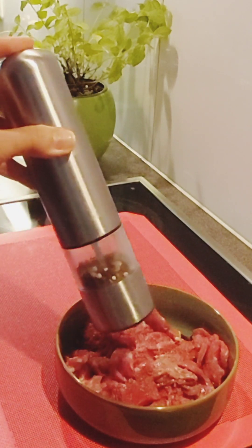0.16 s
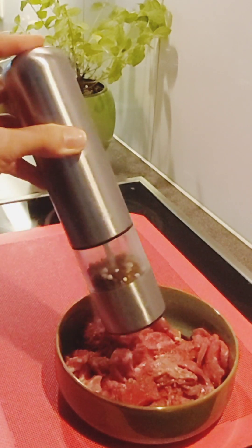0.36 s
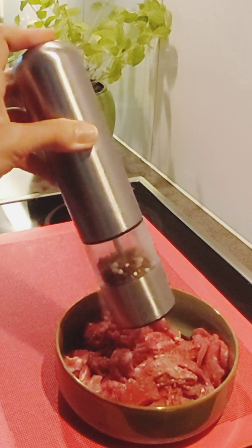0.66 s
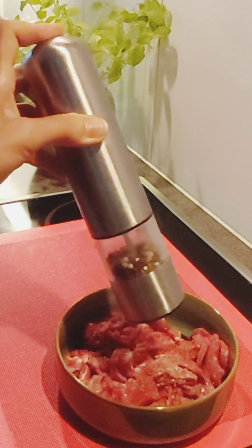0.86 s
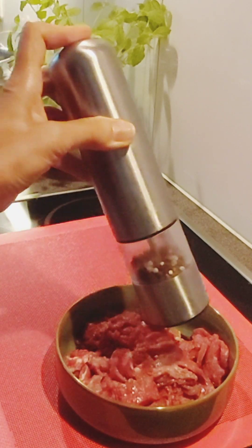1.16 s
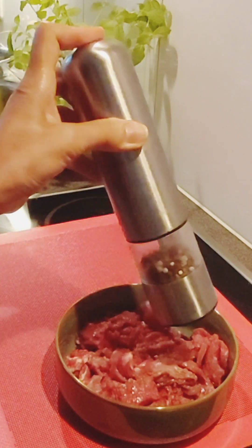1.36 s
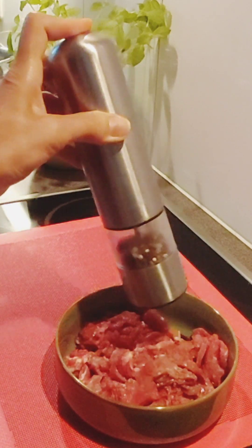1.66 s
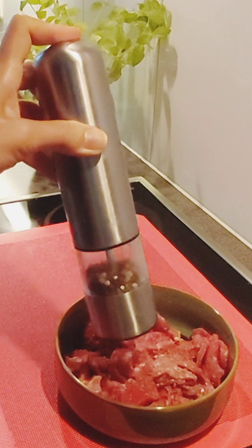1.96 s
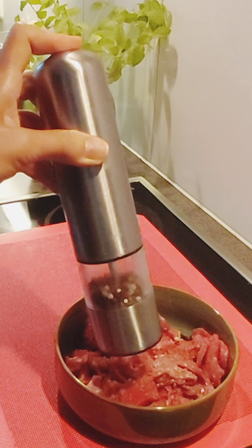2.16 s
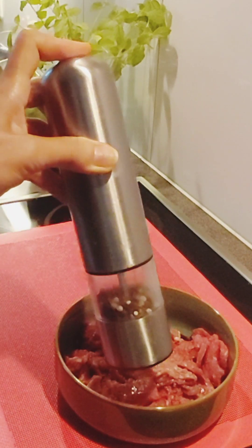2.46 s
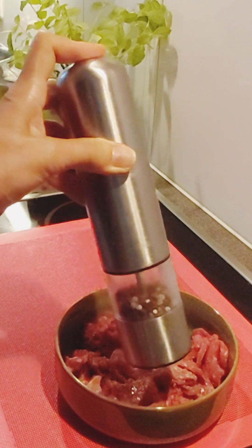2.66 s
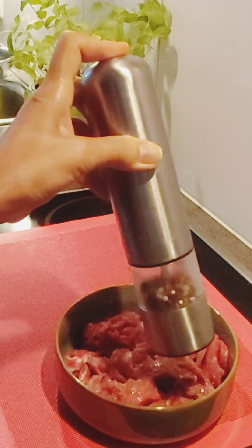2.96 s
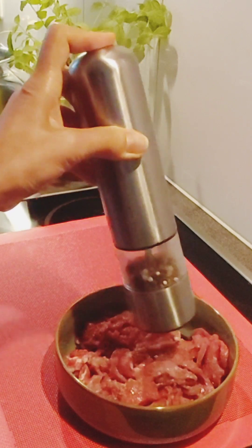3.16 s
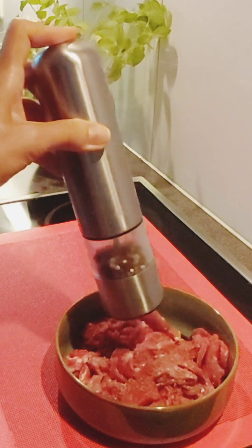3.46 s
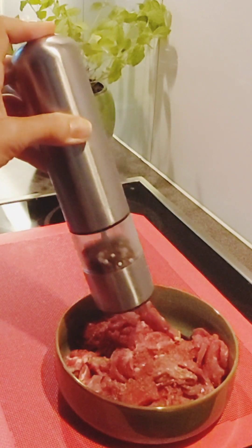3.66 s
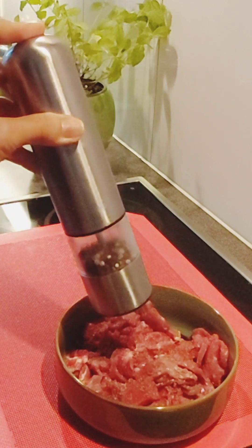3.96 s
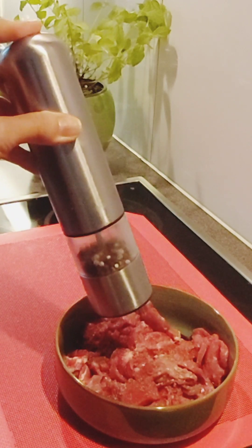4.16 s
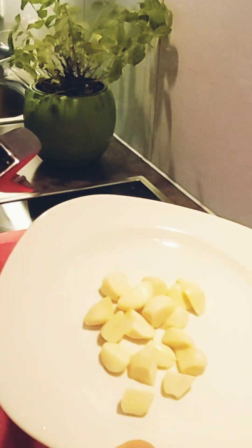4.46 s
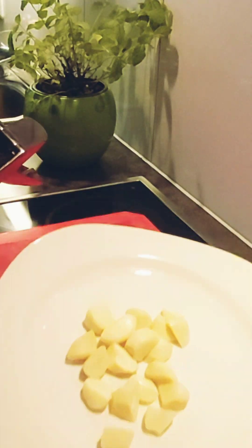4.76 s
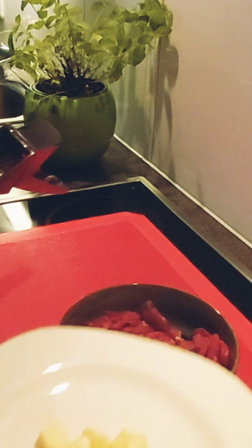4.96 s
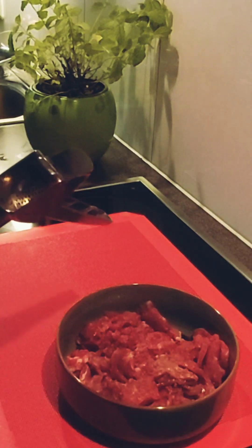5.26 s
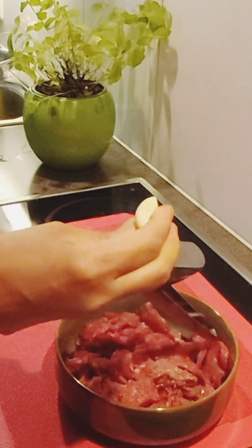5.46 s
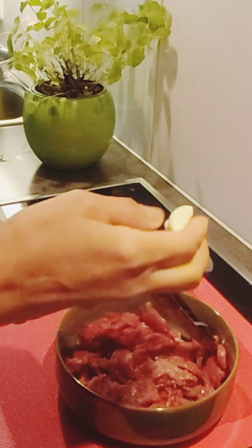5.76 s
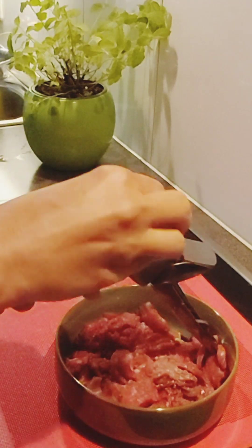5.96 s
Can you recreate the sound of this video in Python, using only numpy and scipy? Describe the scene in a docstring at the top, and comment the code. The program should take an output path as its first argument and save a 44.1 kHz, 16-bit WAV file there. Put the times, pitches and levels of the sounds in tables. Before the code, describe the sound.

Electric grinder buzzing and rattling close by for over four seconds, stopping dead; faint rustle, small clicks and a dull thud follow.

```python
"""Battery pepper mill in a small kitchen

A motor drives an eleven-tooth pinion: sines on multiples of the shaft angle hum and whine. Noise-like tooth
contacts ring the steel housing as a rattle; peppercorns crack in the burr as short, partly noisy rings.
The whir breaks off abruptly; in the quiet room hands move kitchen things about (ticks, rustle, scrape in
filtered noise) and one of them knocks dully (damped modes). Steady room noise and a faint drone lie below."""
import sys
import numpy as np
from scipy import signal
from scipy.fft import rfft, irfft, next_fast_len
from scipy.io import wavfile
from scipy.ndimage import uniform_filter1d

SR = 44100
rng = np.random.default_rng(int(sys.argv[2]) if len(sys.argv) > 2 else 0)


def digitize_waveform(pressure):
    """Quantize a signal to 16-bit integers and store it at the path in sys.argv[1].

    Rows of a 2-D input are taken as channels; values are limited to [-1, 1].
    """
    field = np.atleast_2d(pressure).T
    bounded = np.clip(field, -1, 1)
    quanta = np.round(bounded * 32767).astype(np.int16)
    wavfile.write(sys.argv[1], SR, quanta)


N = 269041
WHIR_END_S = 4.322

# slow level changes of the whir: (time [s], 3.2 kHz resonance [dB], 4.3 kHz resonance [dB],
# 5.7 kHz resonance [dB], treble [dB], shaft tone [dB])
WHIR_COLOUR = [(0, 5.5, -0.5, 1, -4.5, -71.5), (.5, 1, -1, 8.5, -2.5, -75.5), (1, -1, -3, 8.5, -1.5, -85),
               (1.15, 3, 3, 7.5, -1, -84), (1.4, 4, 0, -2.5, -0.5, -82), (1.7, 1, 1.5, -3.5, -2.5, -83.5),
               (2.2, 2.5, 3, 4.5, -2.5, -74), (2.6, -4, 5.5, -2, -1, -77), (2.9, -2, -3, 7, 1, -68.5),
               (3.15, -2, -6.5, -5, -2.5, -70.5), (3.45, 4.5, 3.5, -2, 0.5, -68),
               (3.6, 3.5, 1.5, 4, -1.5, -69.5), (3.8, 8, 3.5, 5.5, -1, -76.5), (4, 5.5, -3, 2.5, -1, -71.5),
               (4.32, 4, 1, 7.5, 1, -66.5)]
# noise spectrum of room and rustle: (frequency [Hz], relative density [dB per Hz])
ROOM_SPECTRUM = [(18, -39.5), (30, -13.5), (50, -6), (160, -5.5), (518, -14), (575, -13.5), (767, -12),
                 (1290, -20.5), (2130, -22.5), (3230, -27), (4310, -24), (7080, -32.5), (10200, -30),
                 (12600, -20.5), (15500, -22)]


def from_db(db):
    """Decibels to gain."""
    return 10 ** (np.asarray(db) / 20)


def rms_one(x):
    """Scale to unit rms."""
    return x / np.sqrt(np.mean(x ** 2) + 1e-20)


def in_time(rows):
    """Columns of a curve table at every sample."""
    time_s, *columns = np.transpose(rows)
    return [np.interp(np.arange(N) / SR, time_s, column) for column in columns]


def at_hz(points, hz):
    """Read a spectrum on a log-frequency axis."""
    point_hz, value = np.transpose(points)
    return np.interp(np.log(hz + 1e-9), np.log(point_hz), value)


def drift(corner_hz):
    """Slow random curve, unit rms: noise at SR / 40 through a double pole."""
    r = np.exp(-2 * np.pi * corner_hz * 40 / SR)
    settle = 2000
    noise = rng.standard_normal(N // 40 + 2 + settle)
    slow = signal.lfilter([1], [1, -2 * r, r * r], noise)[settle:]
    return np.interp(np.arange(N) / 40, np.arange(len(slow)), rms_one(slow))


def resonance(x, hz, width_hz):
    """Two-pole resonance with gain 1 on top."""
    r = np.exp(-np.pi * width_hz / SR)
    zeros = [(1 - r * r) / 2, 0, (r * r - 1) / 2]
    poles = [1, -2 * r * np.cos(2 * np.pi * hz / SR), r * r]
    return signal.lfilter(zeros, poles, x)


def band(x, low_hz, high_hz):
    """Band-pass."""
    return signal.sosfilt(signal.butter(2, [low_hz, high_hz], "band", fs=SR, output="sos"), x)


def coloured(x, spectrum):
    """Impose a spectrum; rms 1."""
    size = next_fast_len(N)
    gain = from_db(at_hz(spectrum, np.fft.rfftfreq(size, 1 / SR)))
    return rms_one(irfft(rfft(x, size) * gain, size)[..., :N])


def bursts(events, cycles, noisy, gain_db, rise_s=0.00032):
    """Short rings, each at its own pitch and partly noise, falling 60 dB within some cycles."""
    length = 4000
    out = np.zeros(N)
    t = np.arange(length) / SR
    noise = rng.standard_normal((len(events), length))
    for (start_s, level_db, hz, *_), hiss in zip(events, noise):
        hiss = rms_one(band(hiss, hz / 1.5, min(hz * 1.5, .45 * SR)))
        envelope = (1 - np.exp(-t / rise_s)) * np.exp(-np.log(1000) * t * hz / cycles)
        ring = (np.sin(2 * np.pi * hz * t) + noisy * hiss) * envelope
        at = round(start_s * SR)
        out[at:at + length] += from_db(level_db + gain_db) * ring[:N - at]
    return out


def tones(turns, orders, wobble_db):
    """Sines on multiples of the shaft angle, each wavering in level."""
    out = 0
    for order, level_db in orders:
        waver_db = wobble_db * (.3 * drift(5) + .9 * drift(30))
        sine = np.sqrt(2) * np.sin(2 * np.pi * round(order) * turns)
        out = out + from_db(level_db + waver_db) * sine
    return out


def motor():
    """Shaft angle in turns, and the tones locked to it: unbalance, slot hum, tooth whine."""
    # (time [s], shaft speed [turns/s], slot hum [dB], tooth whine before braking and slack [dB])
    motor_curve = [(0.0, 172.8, -65, -43), (0.16, 189.9, -64, -51), (0.25, 197.5, -61, -46),
                   (0.46, 215.4, -58, -43), (0.54, 215.8, -55, -40), (0.6, 211.5, -56, -41),
                   (0.655, 196.5, -58, -46), (0.75, 195.5, -64, -47), (0.86, 194.5, -66, -41),
                   (0.95, 203.4, -65, -43), (1.07, 206.0, -63, -40), (1.14, 199.0, -57, -43),
                   (1.24, 202, -55, -41), (1.34, 205.5, -60, -38), (1.44, 208.5, -57, -42),
                   (1.55, 213.8, -57, -36), (1.63, 208.5, -60, -41), (1.87, 189.4, -65, -46),
                   (1.95, 193.1, -63, -47), (2.08, 194.5, -63, -46), (2.16, 196, -64, -47),
                   (2.22, 191.5, -65, -51), (2.33, 187, -63, -50), (2.44, 195.5, -63, -48),
                   (2.54, 197.5, -59, -43), (2.68, 201, -60, -44), (2.75, 209, -59, -52),
                   (2.82, 217, -59, -48), (2.93, 220.5, -63, -42), (3.03, 223.3, -61, -38),
                   (3.12, 221.5, -61, -41), (3.23, 219.5, -64, -49), (3.34, 220, -62, -39),
                   (3.44, 220.8, -60, -48), (3.54, 219.5, -58, -40), (3.68, 217, -55, -40),
                   (3.82, 214.8, -54, -38), (3.93, 216.5, -56, -41), (4.03, 218.6, -58, -44),
                   (4.15, 220, -57, -47), (4.32, 221.5, -62, -51)]
    # fainter tones: (time [s], 4th and 5th shaft order [dB], 2nd slot harmonic [dB],
    # 2nd tooth harmonic, base level [dB])
    octaves = [(0, -70, -57, -52), (.16, -68, -57, -49), (.5, -63, -62, -58), (.65, -70, -57, -52),
               (.82, -70, -57, -47), (.95, -70, -57, -53), (1.08, -71, -58, -44), (1.18, -72, -58, -46),
               (1.3, -67, -57, -52), (1.5, -60, -55, -49), (1.6, -66, -54, -43), (1.68, -67, -55, -49),
               (1.87, -69, -60, -47), (2.14, -70, -57, -42), (2.25, -70, -57, -50), (2.44, -67, -55, -51),
               (2.54, -66, -54, -43), (2.68, -65, -52, -51), (2.82, -64, -64, -56), (3.2, -65, -63, -62),
               (3.82, -63, -57, -60), (4.32, -62, -63, -62)]
    # (multiple of the shaft [1], relative level [dB])
    hum_orders = [(3, -2), (9, -9)]
    # (multiple of the shaft [1], relative level [dB])
    whine_orders = [(11, -1.5), (12, -13), (33, -22)]
    brake_whine_db, hard_brake_turns_per_s2 = 13, 220
    whine_slack_db_per_db = 3   # whine loss per dB of rattle slack
    chatter_db, chatter_hz = -5.5, 69

    turns_per_s, hum_db, whine_db = in_time(motor_curve)
    shaft_db, slot_octave_db, tooth_octave_db = in_time(octaves)
    turns_per_s = uniform_filter1d(turns_per_s, size=1500)   # rotor inertia rounds the corners
    braking = np.clip(-np.gradient(turns_per_s) * SR / hard_brake_turns_per_s2, 0, 1)
    whine_db = whine_db + brake_whine_db * braking   # teeth sing louder while the shaft slows
    whine_db -= whine_slack_db_per_db * slack_db()
    turns = np.cumsum(turns_per_s) / SR
    turns += .008 * drift(25)   # shaft judder blurs high orders most

    hum = from_db(hum_db) * tones(turns, hum_orders, wobble_db=2.4)
    hum += from_db(slot_octave_db) * tones(turns, [(6, 0)], wobble_db=2.0)
    hum += from_db(shaft_db) * tones(turns, [(4, 0), (5, 0)], wobble_db=1.5)
    unbalance = from_db(in_time(WHIR_COLOUR)[-1]) * tones(turns, [(1, 0)], wobble_db=1.5)
    whine = from_db(whine_db) * tones(turns, whine_orders, wobble_db=2.2)
    whine += from_db(tooth_octave_db) * tones(turns, [(22, 1)], wobble_db=3.5)
    # loaded teeth chatter: a rough skirt round both tooth tones
    chatter = sum(drift(chatter_hz) * tones(turns, [(k, 0)], wobble_db=2.0) for k in (11, 22))
    whine += from_db(tooth_octave_db + chatter_db) * chatter
    return turns, hum + unbalance + whine


def rattle(turns):
    """Dense uneven tooth contacts, stronger once a turn, excite housing modes that swell independently."""
    # gears and burr, before flutter and lulls: (time [s], 2.6-6 kHz level [dB])
    rattle_curve = [(0.0, -29.5), (0.01, -36), (0.29, -37), (0.31, -42.5), (0.34, -33.5), (0.4, -39.5),
                    (0.62, -34), (0.74, -37.5), (0.76, -35), (0.78, -36), (0.88, -36.5), (0.92, -39.5),
                    (0.97, -34.5), (1.01, -37), (1.09, -36), (1.32, -38), (1.34, -38), (1.42, -35),
                    (1.44, -41.5), (1.62, -33), (1.64, -37), (1.74, -34), (1.76, -36.5), (2.24, -36.5),
                    (2.34, -33.5), (2.42, -39.5), (2.44, -30), (2.46, -36), (2.58, -34.5), (2.7, -38),
                    (3.1, -37), (3.11, -36), (3.18, -35), (3.2, -38), (3.3, -36), (3.43, -38.5),
                    (3.82, -38), (4.27, -39), (4.28, -35), (4.31, -41.5)]
    # between the resonances: (frequency [Hz], relative density [dB per Hz])
    rattle_spectrum = [(180, -62), (500, -40.5), (800, -24.5), (1500, -14), (3000, -7.5), (5000, -11),
                       (7000, -17), (9500, -28), (13000, -31), (15500, -49.5)]
    # resonances: (frequency [Hz], width [Hz], mean level [dB])
    housing = [(1205, 91, -17.5), (1466, 26, -12), (1695, 40, -9), (1839, 62, -7), (2010, 67, -9.5),
               (2337, 100, -1.5), (2633, 49, -4.5), (2803, 44, -9), (2910, 40, -10), (3130, 45, -3),
               (3520, 90, -7.5), (4150, 45, -7.5), (4211, 35, -8), (4536, 78, -8), (4630, 90, -8),
               (7760, 760, -10.5), (10730, 910, -15.5), (12100, 800, -45)]
    # resonances with slowly changing level: (frequency [Hz], width [Hz], base level [dB])
    changing = [(3220, 79, -2.5), (4334, 147, -1.5), (5677, 160, -10.5)]
    # where the housing radiates badly: (frequency [Hz], width [Hz], share removed [0-1])
    valleys = [(3984, 190, 0.3), (5080, 280, 0.2), (6850, 500, 0.2)]

    level_db, = in_time(rattle_curve)
    level_db = level_db + 0.56 * drift(25) - slack_db()
    *changing_db, treble_db, _ = in_time(WHIR_COLOUR)
    contact_db = 1.6 * drift(110) + 1.4 * np.sin(2 * np.pi * turns)
    contacts = rng.standard_normal((3, N)) * from_db(contact_db)
    out = from_db(-15.5) * coloured(contacts[2], rattle_spectrum)
    for k, (hz, width_hz, top_db) in enumerate(housing):
        swell_db = 1.5 * drift(0.69) + 0.98 * drift(3.1)
        out += from_db(top_db + swell_db) * resonance(contacts[k % 2], hz, width_hz)
    for (hz, width_hz, top_db), gain_db in zip(changing, changing_db):
        swell_db = gain_db + 1.8 * drift(8.84)
        out += from_db(top_db + swell_db) * resonance(contacts[0], hz, width_hz)
    for hz, width_hz, share in valleys:
        out -= np.clip(share, 0, 1) * resonance(out, hz, width_hz)
    out += (from_db(treble_db + 1.1 * drift(24)) - 1) * band(out, 7500, 22000)
    return from_db(level_db) * out / np.std(band(out, 2600, 6000))


def slack_db():
    """Bell-shaped lulls in which the teeth lose contact, as dB of loss."""
    # (centre time [s], depth [dB], full width at 1/e of the depth [s])
    lulls = [(0.305, 17, 0.0095), (0.415, 1.5, 0.097), (0.753, 6, 0.015), (0.914, 2, 0.053),
             (1.03, 0.5, 0.049), (1.347, 3.5, 0.033), (1.446, 2.5, 0.024), (2.46, 3, 0.048),
             (2.82, 8.5, 0.018), (3.22, 1.5, 0.068), (4.331, 10, 0.025)]
    t = np.arange(N) / SR
    return sum(depth_db * np.exp(-(2 * (t - s) / width_s) ** 2) for s, depth_db, width_s in lulls)


def knocking():
    """Peppercorns give way: a mid knock over a low thump, with a shell crack on top."""
    # (time [s], level before burst gain [dB], pitch [Hz], thump rel. [dB], crack rel. [dB])
    knock_events = [(0.187, -23.5, 1060, -23, -15), (.498, -42, 754, -17, -10), (.655, -41, 640, -10, -12),
                    (.845, -41.5, 894, -5, -12), (1.11, -37, 890, -6, -10), (1.459, -43.5, 696, -1, -13),
                    (1.61, -24, 1070, -30, -9), (1.687, -25, 1100, -17, -16),
                    (2.3246, -31.5, 780, -2.5, 3.5), (2.504, -25, 990, -25.5, -21.5),
                    (2.63, -33.5, 830, -14, -14), (2.677, -43.5, 810, -15, -9.5),
                    (3.795, -39, 1110, -21, 7)]
    thump_hz, crack_hz = 332, 2040
    thump_events = [(s, db + thump_db, thump_hz) for s, db, _, thump_db, _ in knock_events]
    crack_events = [(s, db + crack_db, crack_hz) for s, db, _, _, crack_db in knock_events]
    knocks = bursts(knock_events, cycles=6.3, noisy=0.6, gain_db=11.0, rise_s=0.0015)
    thumps = bursts(thump_events, cycles=15.0, noisy=0.61, gain_db=-3.0, rise_s=0.0039)
    cracks = bursts(crack_events, cycles=35.0, noisy=1.9, gain_db=0.5)
    return band(knocks, 510, 3400) + band(thumps, 220, 900) + cracks


def crackle():
    """Peppercorns snap: bright, dry, mostly noisy bursts."""
    # (time [s], level before burst gain [dB], pitch [Hz])
    snaps = [(0.2438, -38, 8000), (0.3366, -38, 8000), (0.4983, -31, 7700), (0.5681, -33, 7900),
             (0.605, -30, 8400), (0.7756, -34, 8000), (0.9702, -35, 8200), (1.065, -33, 8000),
             (1.4826, -16, 13500), (1.4839, -20, 11500), (1.485, -20, 14000), (1.4861, -17, 12500),
             (1.4875, -23, 11500), (1.4893, -20, 12500), (1.493, -24, 13500), (1.4975, -26, 14000),
             (2.4114, -34, 8000), (2.832, -38, 7550), (4.0736, -37, 8000)]
    return bursts(snaps, cycles=55.0, noisy=2.5, gain_db=-9.5, rise_s=.0001)


def thud():
    """One soft blow on a few damped modes."""
    # (frequency [Hz], relative level [dB], t60 [s])
    thud_modes = [(180, -4, 0.027), (288, 6, 0.032), (316, -14.5, 0.44), (614, 6.5, 0.013), (895, -3, 0.02),
                  (1500, -28, 0.036), (1850, -19, 0.054)]
    start_s, level_db, rise_s = 5.9065, -39, .0005
    t = np.maximum(np.arange(N) / SR - start_s, 0)
    modes = sum(from_db(level_db + mode_db - 60 * t / t60_s) * np.sin(2 * np.pi * hz * t)
                for hz, mode_db, t60_s in thud_modes)
    modes *= 1 - np.exp(-t / rise_s)
    return -band(modes, 150, 2200)


def handling():
    """Handled things: ringing ticks, a soft resonant scrape, and noise rustle in a low and a high range."""
    # ticks and taps: (time [s], level before burst gain [dB], pitch [Hz], left-right [dB])
    tick_events = [(4.5797, -56, 12600, -5), (4.65, -61, 3650, -2.5), (4.801, -53, 5280, -4),
                   (4.9462, -54, 13000, -1), (4.978, -59, 4828, 6), (5.231, -62, 4632, 0),
                   (5.241, -65, 4500, 0), (5.2719, -66, 800, -4), (5.297, -66, 1650, -9),
                   (5.297, -61, 3500, -9), (5.3047, -53.5, 1800, -3), (5.3043, -60, 800, -11),
                   (5.3136, -62, 1800, -4), (5.3607, -64, 4700, -0.5), (5.5807, -68, 2630, -6),
                   (5.608, -61, 7700, -10), (5.677, -62, 4060, 2), (5.7783, -53, 7500, -10),
                   (5.7783, -58, 4160, -6), (5.778, -62.5, 850, -1), (5.8561, -50, 12200, -5),
                   (5.9788, -57, 14100, -9), (5.9965, -45, 13700, -14)]
    # (time [s], low range level [dB], high range level [dB])
    rustle_curve = [(4.34, -74, -83), (4.5, -75, -74.5), (4.85, -79, -72.5), (5.05, -62, -71.5),
                    (5.19, -70, -78), (5.24, -75, -67), (5.31, -64.5, -68), (5.39, -78, -65),
                    (5.45, -96, -74), (5.65, -62, -70.5), (5.78, -68, -69), (5.88, -72, -65.5),
                    (5.95, -66, -69), (6.1, -64, -75)]
    # (time [s], level [dB])
    scrape_curve = [(5.21, -95), (5.24, -79), (5.285, -78), (5.305, -69), (5.325, -73), (5.37, -73),
                    (5.42, -95)]
    rise_cycles, rustle_pan_db = 1.5, -1.5   # pan: left-right
    scrape_hz, scrape_width_hz = 1740, 600

    ticks = 0
    for row in tick_events:
        _, _, hz, pan_db = row
        tick = bursts([row], cycles=35.0, noisy=0.69, gain_db=3.5, rise_s=rise_cycles / hz)
        ticks = ticks + tick * from_db([[pan_db / 2], [-pan_db / 2]])
    low_db, high_db = in_time(rustle_curve)
    grains = coloured(rng.standard_normal((2, N)), ROOM_SPECTRUM) * from_db(1.5 * drift(30.4))
    rustle = from_db(low_db) * rms_one(band(grains, 130, 510))
    rustle += from_db(high_db) * rms_one(band(grains, 490, 9000))
    scrape_db, = in_time(scrape_curve)
    scrape = resonance(grains, scrape_hz, scrape_width_hz)
    scrape = resonance(scrape, scrape_hz, scrape_width_hz)
    rustle += from_db(scrape_db) * rms_one(scrape)
    rustle *= from_db([[rustle_pan_db / 2], [-rustle_pan_db / 2]])
    return ticks + rustle * (np.arange(N) > WHIR_END_S * SR)


def room_tone():
    """Steady stereo noise, its channels most alike in the bass, and the faint drone of a far appliance."""
    # (frequency [Hz], left-right likeness [-1 to 1])
    likeness = [(60, 0.58), (240, 0.078), (950, -0.13), (3770, -0.18), (15000, 0.089)]
    air_db = -64.5
    drone_hz, drone_width_hz, drone_db = 155.3, 6.1, -76
    size = next_fast_len(N)
    alike = np.clip(at_hz(likeness, np.fft.rfftfreq(size, 1 / SR)), -1, 1)
    mid, side = rfft(rng.standard_normal((2, size)))
    air = irfft(np.sqrt(1 + alike) * mid + np.sqrt(1 - alike) * side * [[1], [-1]], size)[:, :N]
    drone = rms_one(resonance(rng.standard_normal(N), drone_hz, drone_width_hz))
    return from_db(air_db) * coloured(air, ROOM_SPECTRUM) + from_db(drone_db) * drone


def kitchen(x, wet_db, t60_s, moves_hz=2.35):
    """Direct sound and echo tail reach two microphone ports; the echo pattern shifts as the source moves."""
    # (frequency [Hz], left-right [dB])
    port_balance = [(60, -6), (110, -7.5), (200, 2.5), (380, -5.5), (700, -3.5), (1290, 5), (2380, -4),
                    (4400, 3), (8120, -6), (15000, -2)]
    # (frequency [Hz], left lead [rad])
    port_phase = [(0, 0), (1810, -0.3), (2670, 0.5), (4480, 0.5), (5430, 7.7), (5770, 5.3), (6030, 6.5),
                  (8270, 2.3), (9040, 4.1), (11200, 17.6), (12000, 25.1), (12600, 27.6), (14000, 25.4),
                  (16200, 32.8)]
    echo_cut_hz = 60000
    size = next_fast_len(N + SR)
    hz = np.fft.rfftfreq(size, 1 / SR)
    t = np.arange(SR // 2) / SR
    tails = rng.standard_normal((2, 2, SR // 2)) * from_db(-60 * t / t60_s) * (t > .004)
    tails *= from_db(wet_db) / np.sqrt(np.sum(tails ** 2, axis=-1, keepdims=True))
    place_rad = 2.76 * drift(moves_hz)   # crossfades two tail pairs
    echo = rfft(x * np.cos(place_rad), size) * rfft(tails[0], size)
    echo += rfft(x * np.sin(place_rad), size) * rfft(tails[1], size)
    echo /= 1 + hz / echo_cut_hz   # very slight treble roll-off of the echo
    balance = from_db(at_hz(port_balance, hz) / 2)
    lead = np.exp(.5j * np.interp(hz, *np.transpose(port_phase)))
    direct = rfft(x, size) * [lead, 1 / lead]
    return irfft([balance, 1 / balance] * (direct + echo), size)[:, :N]


def scene():
    """The whir stops abruptly with its echo; a very short, faint fade lingers for a moment; handling, thud and
    room go on."""
    t60_s, echo_db, near_echo_db = .2, -.2, -8
    fade_db, fade_t60_s = -18, 0.06   # short fade after the cut
    thud_pan_db = -2.5   # left-right
    after_s = np.arange(N) / SR - WHIR_END_S
    fade = from_db(fade_db - 60 * np.maximum(after_s, 0) / fade_t60_s)
    sounding = np.clip(-after_s / 0.0004, fade, 1)
    turns, motor_tones = motor()
    whir = kitchen(rattle(turns) + knocking(), echo_db, t60_s)
    # tones and snaps are heard drier, with less echo and a slower shift
    whir += kitchen(motor_tones + crackle(), near_echo_db, t60_s, moves_hz=0.54)
    blow = kitchen(thud(), wet_db=-4, t60_s=0.48) * from_db([[thud_pan_db / 2], [-thud_pan_db / 2]])
    return whir * sounding + blow + handling() + room_tone()


def record(dry):
    """Steep low-pass, 70 dB down from 16.25 kHz up."""
    return signal.sosfilt(signal.cheby2(16, 70, 16250, fs=SR, output="sos"), dry)


dry = scene()
out = record(dry)
digitize_waveform(out)
```